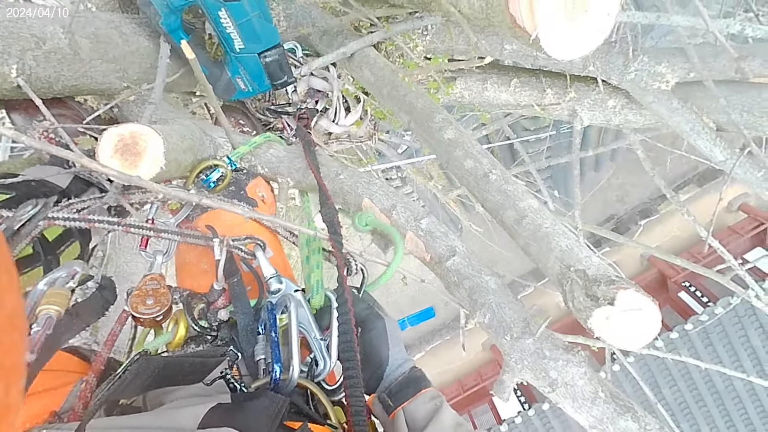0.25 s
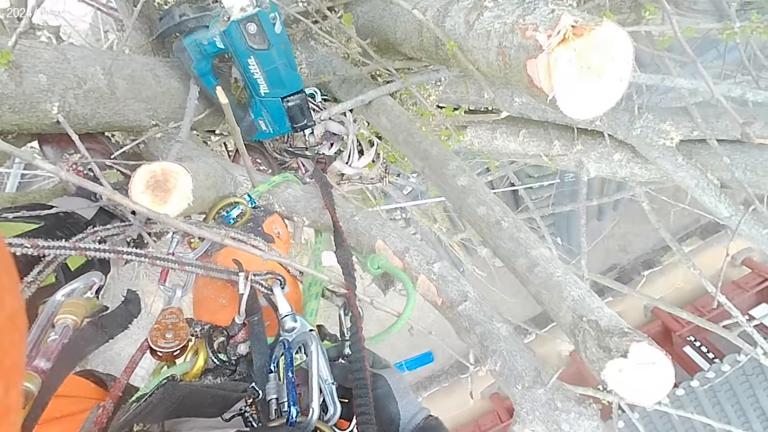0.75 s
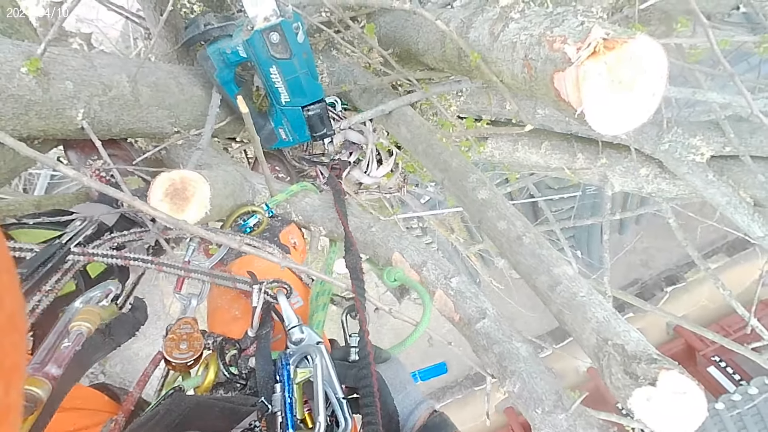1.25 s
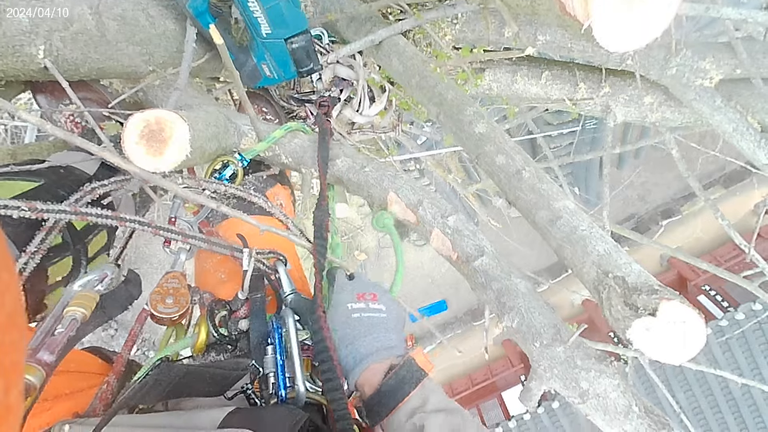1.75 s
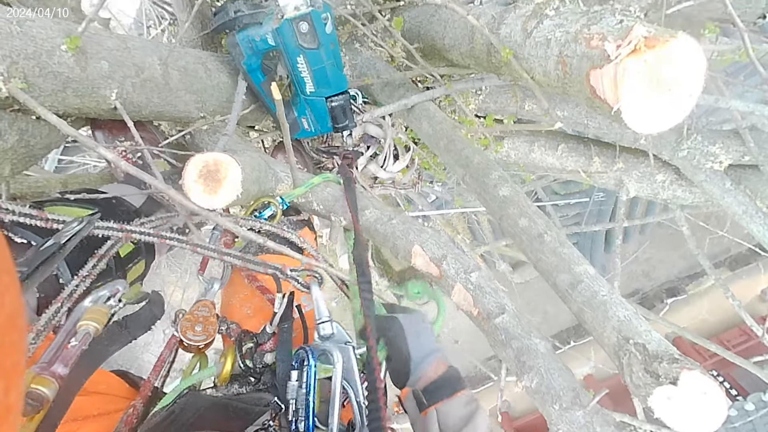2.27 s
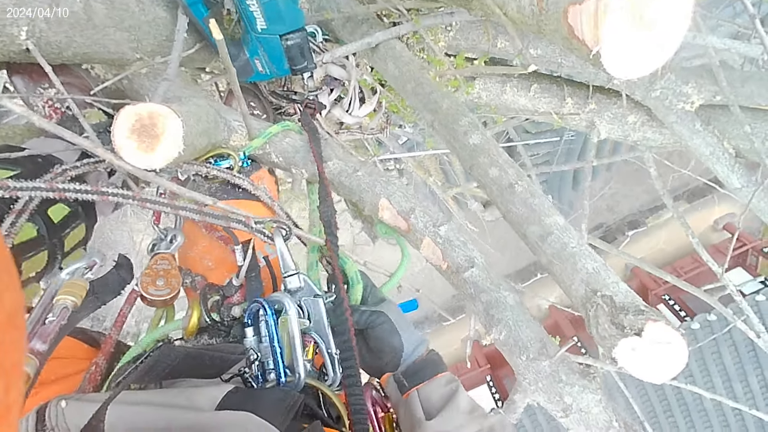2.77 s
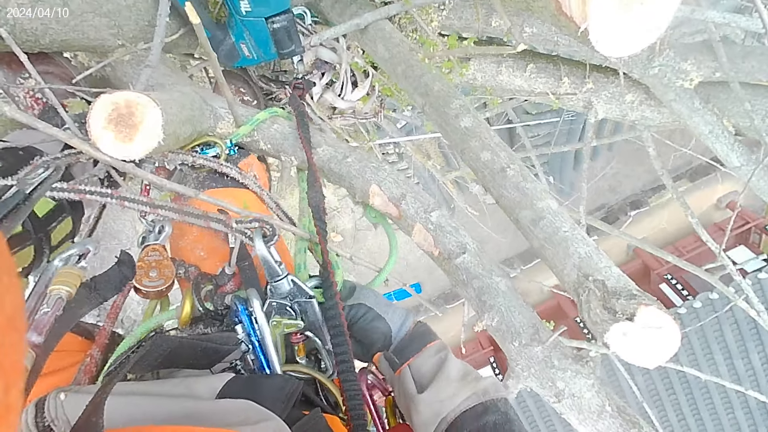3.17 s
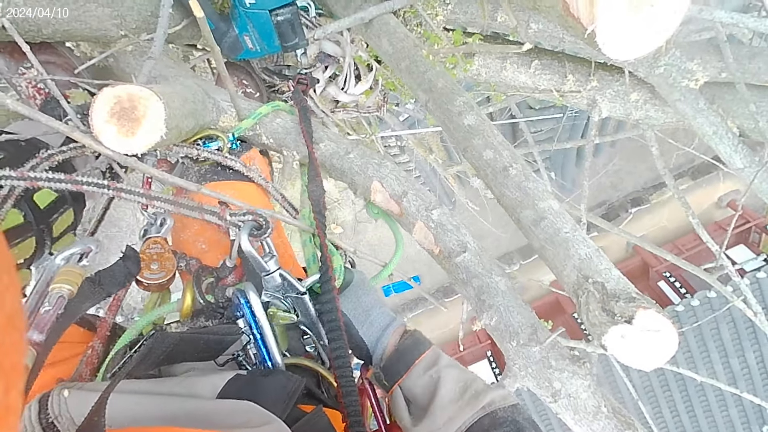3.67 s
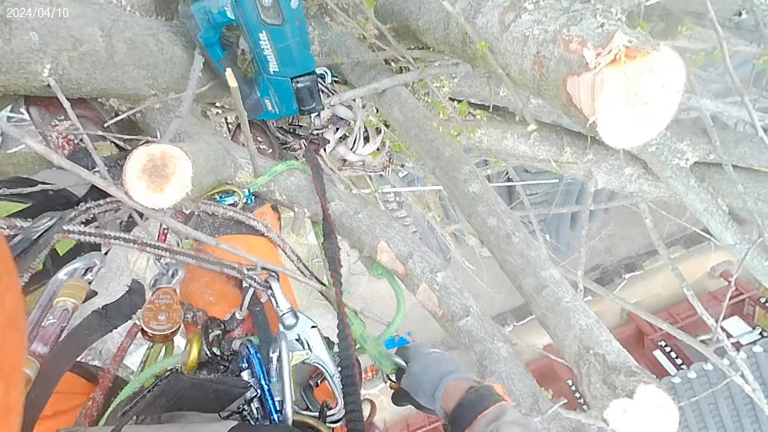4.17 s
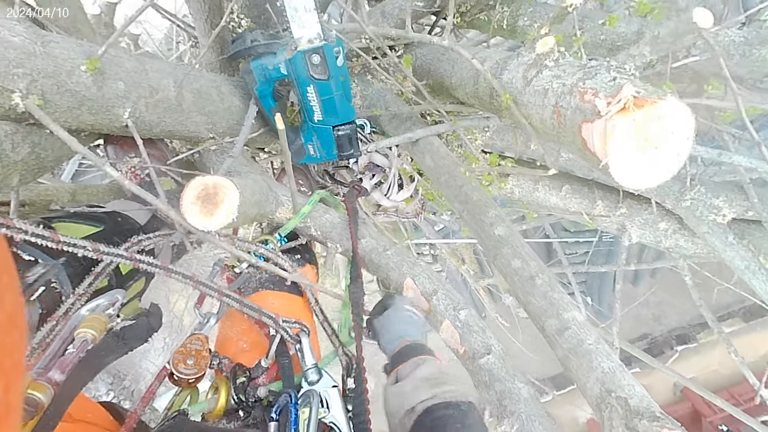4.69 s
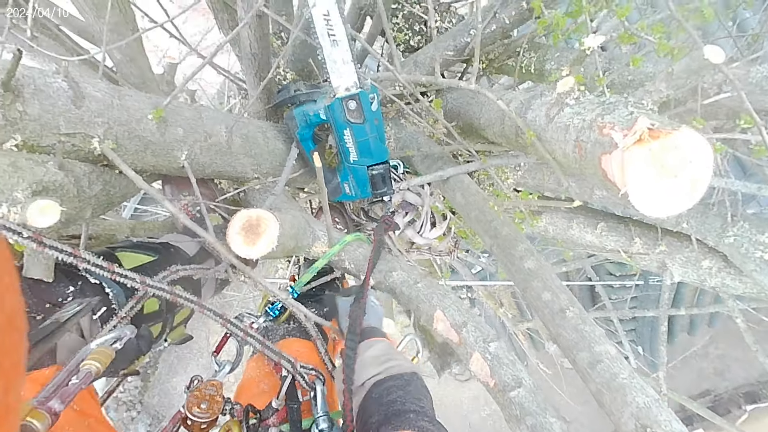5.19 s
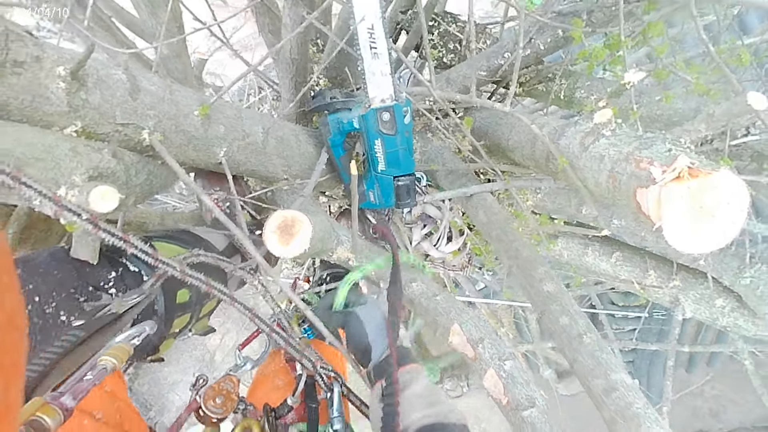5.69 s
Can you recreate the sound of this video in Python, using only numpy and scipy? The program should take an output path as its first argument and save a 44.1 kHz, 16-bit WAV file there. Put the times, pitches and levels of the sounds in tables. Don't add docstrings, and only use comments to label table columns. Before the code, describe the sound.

Loose metal climbing hardware clicks and clinks in uneven clusters on a harness while wind rumbles, flutters and bumps against a close microphone outdoors.

```python
import sys
import numpy as np
from scipy import signal
from scipy.fft import rfft, irfft
from scipy.io import wavfile
from scipy.ndimage import uniform_filter1d

SR = 44100
rng = np.random.default_rng(int(sys.argv[2]) if len(sys.argv) > 2 else 0)


def field_ratio(decibels):
    return 10 ** (np.asarray(decibels, dtype=float) / 20)


def store_wav(level_fs):
    pcm = np.round(np.clip(np.atleast_2d(level_fs), -1, 1) * 32767)
    wavfile.write(sys.argv[1], SR, pcm.T.astype(np.int16))


N = 261954
TIME = np.arange(N) / SR


def unit(x):
    return x / np.sqrt(np.mean(x ** 2) + 1e-30)


def colour(x, points):
    hz, db = np.transpose(points)
    log_hz = np.log(np.fft.rfftfreq(len(x), 1 / SR) + 1e-3)
    gain = field_ratio(np.interp(log_hz, np.log(hz), db, left=-80, right=-80))
    return irfft(rfft(x) * gain, len(x))


def hump(hz, octaves, skirt_db):
    return [(hz / 2 ** octaves, skirt_db), (hz, 0), (hz * 2 ** octaves, skirt_db)]


def smooth_twice(x, size):
    return uniform_filter1d(uniform_filter1d(x, size), size)


def walk(rate):
    hold = int(SR / rate)
    steps = np.repeat(rng.standard_normal(N // hold + 1), hold)
    return unit(smooth_twice(steps, hold)[:N])


def steady(x, window_s=0.16):
    return x / np.sqrt(smooth_twice(x ** 2, int(window_s * SR)) + 1e-30)


def curves(table):
    s, *columns = np.transpose(table)
    return [np.interp(TIME, s, c) for c in columns]


def add(out, s, x):
    i = int(s * SR)
    out[i:i + len(x)] += x[:N - i]


# freq_hz [Hz], density_db [dB per Hz]
AIR_SPECTRUM = [(100, -20), (150, -2), (340, -8.4), (950, -17.2), (1600, -25), (4500, -31), (15750, -35.6),
                (15950, -52)]


def air():
    level_db = -51.7 + 0.5 * walk(1.5)
    return unit(colour(rng.standard_normal(N), AIR_SPECTRUM)) * field_ratio(level_db)


# start_s [s], level_db [dB]
FAR_KNOCKS = [(0.433, -60), (0.525, -55), (0.62, -53), (0.719, -52.5), (.82, -53), (.92, -55.5),
              (1.024, -56.5), (1.123, -61), (1.224, -57)]


def machine():
    out, t = np.zeros(N), TIME[:4096]
    for s, db in FAR_KNOCKS:
        puff = unit(colour(rng.standard_normal(len(t)), [(700, 4), (1400, -6), (2300, -3.5), (4500, -22)]))
        add(out, s, field_ratio(db + 2.5 - 60 * t / 0.1) * (1 - np.exp(-t / 0.00093)) * puff)
    return out


# start_s [s], level_db [dB]
GUST = [(0, -33), (.2, -24), (.65, -25), (1.1, -24), (1.27, -37), (1.47, -23), (1.62, -33), (2.1, -34),
        (2.4, -39), (2.72, -34), (3.1, -37), (3.4, -32), (3.75, -32), (4.3, -27.5), (4.65, -42), (5.2, -29),
        (5.55, -33), (5.86, -30)]
# freq_hz [Hz], density_db [dB per Hz]
RUMBLE_SPECTRUM = [(8, 4), (20, 3), (35, -6), (55, -10.5), (90, -36)]
# freq_hz [Hz], density_db [dB per Hz]
FLUTTER_SPECTRUM = [(40, -28), (65, 1.5), (120, -2), (200, -18), (350, -32)]


def buffeting():
    gust_db, = curves(GUST)
    flutter_db = -42.5 + 0.48 * (gust_db + 28)
    rumble = steady(colour(rng.standard_normal(N), RUMBLE_SPECTRUM))
    flutter = unit(colour(rng.standard_normal(N), FLUTTER_SPECTRUM))
    out = field_ratio(gust_db + 1.8 + 2.2 * walk(14)) * rumble
    return out + field_ratio(flutter_db - 3.5 + 1.97 * walk(22)) * flutter


# start_s [s], peak_db [dB], cycle_hz [Hz]
SLAPS = [(0.033, -27.5, 65.7), (0.086, -26, 73.0), (0.191, -20, 79.5), (0.434, -22, 70), (0.48, -27, 70.5),
         (0.528, -25.5, 91.5), (0.773, -22, 70.4), (0.818, -22, 66.5), (1.041, -22, 80.5),
         (1.149, -29, 85.5), (1.287, -27.5, 75.5), (2.161, -26, 64), (2.983, -33, 80.0), (3.071, -27, 70),
         (3.848, -18.5, 53), (3.885, -21, 98), (4.318, -26, 59), (4.399, -28.5, 61), (4.563, -24.5, 50.7),
         (4.73, -33, 50.3), (4.842, -26, 49), (5.112, -27, 49.7), (5.145, -32, 80), (5.388, -36, 50),
         (5.858, -28.5, 57)]
# start_s [s], peak_db [dB], cycle_hz [Hz]
DIPS = [(.29, -17, 30), (.648, -14, 40), (1.008, -19, 35), (1.212, -20, 40), (2.733, -14, 30),
        (3.27, -19, 30), (4.335, -18, 40), (5.126, -22, 45), (5.335, -20, 40), (5.48, -23, 25),
        (2.01, -23, 25), (5.71, -24, 25)]
# start_s [s], peak_db [dB], swing_hz [swings per s]
SHOVES = [(1.442, -15, 22), (1.909, -20, 40), (4.1165, -10, 38), (2.092, -24, 32), (5.285, -22, 15),
          (4.975, -21, 16), (1.522, -24, 18)]


def eddies():
    out, t = np.zeros(N), TIME[:4410] - 0.05
    for s, db, hz in SLAPS:
        swing = -np.tanh(8 * t * hz) * np.exp(-(t * hz / 0.73) ** 2)
        add(out, max(s + t[0], 0), field_ratio(db + 3.5) * swing)
    for s, db, hz in DIPS:
        u = (2.2 * t * hz) ** 2
        add(out, s + t[0], field_ratio(db) * (2 * u - 1) * np.exp(-u))
    for s, db, hz in SHOVES:
        turn = np.minimum(TIME[:len(t)] * hz, 1)
        onset = np.minimum(turn / 0.12, 1)
        add(out, s, field_ratio(db - 6 * turn) * onset * np.sin(2 * np.pi * turn ** 0.75))
    return out


# start_s [s], creak_db [dB]
EFFORT = [(0, -70), (1.32, -70), (1.58, -48), (1.8, -69), (2.3, -58), (2.52, -50), (2.7, -79), (3.4, -62),
          (3.58, -68), (3.9, -57), (4.12, -52), (4.35, -66), (5.05, -58), (5.64, -60), (5.72, -49),
          (5.82, -43), (5.94, -49)]
# start_s [s], rustle_db [dB]
DRAG = [
    (5.55, -76),
    (5.64, -66),
    (5.72, -63),
    (5.77, -74),
    (5.82, -63),
    (5.94, -72),
]


def rope():
    (creak_db,), (drag_db,) = curves(EFFORT), curves(DRAG)
    rustle_db = -70.5 + 0.33 * (creak_db + 61)
    burst_db = 3.5 * np.minimum(rng.exponential(size=(2, N)), 6)
    fibres, webbing = rng.standard_normal((2, N)) * field_ratio(burst_db)
    rustle = unit(colour(fibres, [(3000, -1), (6000, 1), (9500, -5), (12500, -10.5), (15500, -5)]))
    rustle = rustle * field_ratio(rustle_db - 1.3 + 1.8 * walk(150))
    sheath = unit(colour(fibres, [(5000, -13), (9800, 0), (13000, -13), (15500, -28)]))
    sheath = (TIME > DRAG[0][0]) * field_ratio(drag_db) * sheath
    creak = unit(colour(webbing, hump(695, 1.5, -15.5))) * field_ratio(creak_db - 4.0 + 3.9 * walk(40))
    return rustle + sheath + creak


# start_s [s], pitch_hz [Hz], level_db [dB]
RINGS = [(1.3944, 11070, -47), (1.4368, 6830, -50), (1.4368, 11000, -50.5), (1.592, 4800, -47),
         (1.6915, 11100, -50), (2.4214, 9520, -57), (2.8219, 8200, -62), (2.8497, 10070, -44),
         (2.8735, 12400, -54), (4.1009, 4690, -51), (4.1646, 11530, -61), (4.9611, 6480, -56),
         (5.0598, 7760, -60), (5.0678, 7500, -56), (5.0758, 7820, -51.5), (5.7233, 6480, -39.5),
         (5.7233, 8160, -39), (5.7233, 10050, -44), (5.8099, 11000, -54), (5.8354, 10000, -54),
         (5.8354, 10910, -60), (5.9327, 12500, -55)]
# pitch_hz [Hz], level_db [dB], fall_s [s to fall 80 dB]
GATE_MODES = [
    (2310, -43, 0.028),
    (7600, -57, 0.24),
    (7770, -23.5, 0.052),
    (10910, -37, 0.093),
]
# start_s [s], pitch_hz [Hz], level_db [dB], fall_s [s to fall 80 dB]
BODIES = [(3.7406, 600, -40, .03), (5.809, 300, -38, .06), (5.69, 280, -44, .06), (5.0037, 1600, -40, .02),
          (.3432, 720, -50, .04), (.354, 700, -52, .03), (.444, 900, -46, .03), (.4738, 850, -48, .03),
          (.558, 1000, -51, .03), (3.918, 800, -44, .04), (5.684, 760, -43, .03), (1.4368, 645, -52, .04),
          (3.7641, 740, -38, .025), (3.7765, 690, -33, .04), (4.1009, 444, -31.5, 0.045),
          (5.7886, 300, -40, 0.17), (5.7892, 960, -20.5, 0.018), (5.7886, 1563, -35, 0.056),
          (5.8354, 1830, -39, 0.044), (5.8964, 980, -30.5, .027)]
# start_s [s], pitch_hz [Hz], level_db [dB]
CHIMES = [(1.3944, 6500, -46), (1.406, 6600, -54), (1.5767, 11000, -46), (1.592, 9300, -44),
          (1.6066, 11000, -45), (1.6066, 4700, -44), (1.6915, 3900, -42), (1.6925, 6300, -46),
          (2.2225, 7400, -50), (2.2686, 9600, -38), (2.27, 5000, -42), (2.8735, 10200, -48),
          (2.9101, 3200, -44), (2.912, 10200, -42), (2.962, 9800, -58), (3.464, 9400, -57),
          (3.47, 5600, -56), (3.4858, 1950, -48), (3.488, 9400, -50), (3.7406, 8800, -46),
          (3.92, 10700, -52), (3.9612, 5300, -52), (4.06, 3650, -52), (4.066, 6300, -54),
          (4.0812, 10900, -52), (4.0919, 12600, -46), (4.0919, 3200, -50), (4.1166, 4650, -38),
          (4.119, 9500, -42), (4.1482, 10800, -50), (4.2449, 8400, -52), (4.2449, 12400, -56),
          (4.396, 11800, -57), (4.4152, 6800, -52), (4.9611, 11700, -56), (5.403, 5300, -44),
          (5.884, 11800, -54)]
# start_s [s], level_db [dB]
LINK_NUDGES = [(1.525, -67), (1.9556, -67), (2.0411, -63), (2.103, -68), (2.2394, -69), (2.381, -68),
               (2.5327, -63), (4.2443, -59)]


def rings():
    out, t = np.zeros(N), TIME[:8820]
    struck = [(s, hz, db, 0.067) for s, hz, db in RINGS]
    struck += [(5.0037, *mode) for mode in GATE_MODES]
    struck += list(BODIES)
    struck += [(s, hz, db - 2, 0.034) for s, hz, db in CHIMES]
    struck += [(s, 5600, db, 0.18) for s, db in LINK_NUDGES]
    for s, hz, db, t60 in struck:
        twin_phase = 2 * np.pi * rng.random()
        touch_db = 3 * unit(uniform_filter1d(rng.standard_normal(len(t)), size=90))
        pair = np.sin(2 * np.pi * hz * t) + 0.3 * np.sin(2 * np.pi * hz * 1.008 * t + twin_phase)
        add(out, s, field_ratio(db + 5.5 - 80 * t / t60 + touch_db) * (1 - np.exp(-t / 0.00077)) * pair)
    return out


# start_s [s], pitch_hz [Hz], level_db [dB]
SNAPS = [(1.4366, 7700, -33), (1.5765, 4480, -35), (1.5918, 9500, -32), (1.6064, 2760, -40),
         (1.6066, 6090, -35), (1.6816, 3450, -37), (1.6816, 2300, -44), (2.2215, 7580, -40),
         (2.2686, 3560, -38), (2.2687, 7240, -19), (2.4902, 6200, -32), (2.5327, 4700, -36),
         (2.5586, 6090, -38), (2.5588, 3100, -40), (2.9103, 6320, -24), (3.7406, 3220, -38),
         (3.7641, 6890, -30), (3.778, 7000, -24), (4.109, 4700, -38), (5.0043, 6320, -21),
         (5.0043, 11140, -26), (5.7185, 10100, -34), (5.7897, 3450, -19), (5.7897, 8300, -22),
         (5.806, 10000, -36), (5.82, 8000, -34), (5.8356, 3220, -36), (5.8579, 6900, -38),
         (3.5136, 5500, -40), (3.618, 5800, -46)]
# start_s [s], pitch_hz [Hz], level_db [dB]
THUDS = [(1.3946, 620, -42), (1.4425, 720, -34), (1.561, 650, -39), (1.58, 560, -39), (1.636, 920, -46),
         (1.8325, 1260, -42), (2.2265, 800, -37), (2.2967, 1490, -43), (2.332, 900, -40),
         (2.5327, 1150, -43), (2.579, 800, -39), (2.8803, 700, -41), (3.4858, 1950, -42),
         (3.4858, 700, -37), (3.7645, 880, -28), (3.7768, 740, -20), (3.778, 2180, -40), (3.789, 800, -36),
         (4.1009, 1950, -38), (4.1015, 600, -26), (5.0037, 1600, -36), (5.7925, 1490, -25),
         (5.806, 480, -36), (5.809, 2070, -38), (5.8165, 1840, -37), (5.8356, 920, -33), (4.502, 800, -40)]


def snaps_and_thuds():
    out, t = np.zeros(N), TIME[:1500]
    for table, t60 in ((SNAPS, 0.007), (THUDS, 0.022)):
        for s, hz, db in table:
            add(out, s, field_ratio(db - 60 * t / t60) * np.sin(2 * np.pi * hz * t))
    return out


# start_s [s], level_db [dB]
PUSHES = [
    (.4448, -32),
    (.4752, -35),
    (5.7894, -12),
]


def pushes():
    out, width_s = np.zeros(N), 0.00012
    for s, db in PUSHES:
        u = (TIME - s) / width_s
        out += field_ratio(db) * (np.exp(-u ** 2) - np.exp(-(u / 4 - 1) ** 2) / 4)
    return out


# start_s [s], crack_db [dB], brightest_hz [Hz], rattle_t60_s [s]
FREE_CLINKS = [(1.3944, -30.5, 9520, 0.02), (1.5767, -35, 4500, .038), (1.592, -29.5, 6740, .051),
               (1.6066, -28, 6750, 0.039), (1.9556, -42, 6380, .036), (2.2586, -47, 7640, .034),
               (2.2686, -25, 7370, 0.03), (2.4399, -44, 7600, .03), (2.4902, -31.5, 6240, .064),
               (2.8219, -41.5, 6980, 0.063), (2.8497, -32, 10000, 0.04), (2.8735, -40, 5990, 0.054),
               (2.8855, -41, 6910, .022), (2.9101, -28, 6750, 0.025), (4.0919, -34, 7860, 0.027),
               (4.6909, -40, 9800, .014), (4.7096, -37.5, 6840, 0.043), (4.9952, -31.5, 7600, .073),
               (5.0037, -19.5, 7900, 0.03), (5.0073, -23, 7640, .027), (5.7183, -37, 6440, 0.028),
               (5.7233, -34, 8270, 0.064), (5.7925, -15, 8130, 0.016)]
# start_s [s], crack_db [dB], brightest_hz [Hz], rattle_t60_s [s]
HARNESS_CLINKS = [(1.6915, -30, 8300, 0.03), (2.2902, -46, 9910, .028), (2.2967, -34, 4400, .05),
                  (2.8803, -37.5, 8300, 0.02), (3.7406, -35, 3470, .025), (4.1166, -28, 7060, .031),
                  (4.3939, -41.5, 6740, .041), (4.4152, -41.5, 9700, 0.044), (4.9611, -46, 10200, .044),
                  (5.6973, -34.5, 9600, 0.011), (5.8681, -43, 6100, 0.057), (5.8964, -32.5, 4640, 0.055),
                  (5.9327, -39, 8000, .039)]
# start_s [s], crack_db [dB], brightest_hz [Hz], rattle_t60_s [s]
FREE_CLACKS = [(2.0411, -44, 6560, .036), (2.2394, -42, 5200, .027), (2.3137, -42.5, 6700, .032),
               (2.5586, -39, 5880, 0.031), (3.5136, -47, 3170, .029), (3.7867, -31.5, 6700, .019),
               (4.1821, -43, 7400, 0.034), (4.2449, -40.5, 5600, 0.04), (5.8579, -46, 6760, 0.045),
               (5.8837, -44, 8910, 0.21)]
# start_s [s], crack_db [dB], brightest_hz [Hz], rattle_t60_s [s]
BUCKLE_CLACKS = [(1.6814, -44, 3500, 0.027), (1.6229, -44, 6760, .034), (2.4214, -43.5, 4700, 0.081),
                 (2.4872, -47, 6170, .03), (2.5327, -38, 4830, .025), (3.2073, -42, 3360, .017),
                 (3.9865, -40, 5200, 0.038), (4.0812, -40.5, 4500, .021), (4.1009, -27, 4670, 0.018),
                 (5.4018, -34.5, 9740, 0.037), (5.8354, -30.5, 6100, 0.044)]
# start_s [s], crack_db [dB], brightest_hz [Hz], rattle_t60_s [s]
BUMPS = [
    (.3432, -51.5, 4600, .03),
    (.4738, -49, 4830, 0.03),
    (2.0646, -45.5, 5170, 0.015),
    (5.7894, -28, 6120, 0.05),
    (5.81, -40, 5300, 0.061),
]
# start_s [s], crack_db [dB], brightest_hz [Hz], rattle_t60_s [s]
BELT_CLINKS = [(1.4368, -39, 4960, 0.048), (1.8309, -39, 10200, 0.047), (2.2269, -43, 5000, 0.03),
               (3.4858, -36, 6840, 0.027), (3.7641, -29, 7020, .013), (3.7765, -25, 9000, 0.044),
               (3.918, -37, 6400, 0.029), (3.9612, -40, 10600, .026), (4.1482, -41.5, 3840, .038),
               (5.82, -45, 7040, .06), (5.8304, -51, 4650, .043)]
# start_s [s], crack_db [dB], brightest_hz [Hz], rattle_t60_s [s]
REBOUNDS = [(1.406, -50, 9500, .03), (1.604, -42, 5000, .02), (1.611, -42, 7000, .02),
            (2.2225, -47, 7400, .012), (2.273, -43, 7300, .03), (2.335, -50, 9000, .015),
            (2.342, -49, 8000, .015), (2.472, -50, 5500, .015), (2.87, -48, 6500, .015),
            (2.921, -44, 8000, .02), (3.83, -57, 5200, .05), (4.104, -36, 9000, .025),
            (4.656, -56, 6800, .03), (5.407, -49, 8000, .03), (5.737, -48, 10000, .04),
            (5.668, -52, 9800, .03), (5.685, -50, 9500, .02), (5.705, -50, 10200, .03),
            (5.799, -47, 2200, .03), (5.826, -48, 6500, .02), (5.843, -46, 4000, .03),
            (5.875, -50, 9400, .03), (5.892, -49, 7000, .015), (5.904, -44, 6500, .03),
            (5.912, -50, 8600, .03), (2.497, -44, 9500, .03), (2.432, -50, 12000, .015),
            (3.781, -36, 10500, .02), (3.791, -38, 4200, .02), (5.012, -50, 5300, .025)]
# start_s [s], crack_db [dB]
THIN_TICKS = [(1.032, -55), (1.2957, -54), (1.572, -49), (1.7243, -60), (1.77, -49.5), (1.7855, -55),
              (2.0, -50), (2.4346, -48), (2.5258, -51), (2.6422, -57), (2.6917, -52), (2.8007, -52),
              (2.898, -51), (2.9526, -52), (4.058, -50), (4.065, -52), (5.0598, -64), (5.0678, -61),
              (5.215, -55)]
# start_s [s], crack_db [dB]
PLAIN_TICKS = [(.078, -55), (.5703, -50.5), (.5806, -54), (1.5631, -50), (1.6433, -55), (1.7306, -52),
               (2.103, -55), (2.204, -51), (2.214, -52), (2.33, -46), (2.339, -51), (2.3495, -52),
               (2.381, -54.5), (2.4052, -60), (2.595, -63), (2.934, -56), (3.0407, -49), (3.217, -50.5),
               (3.2295, -59), (3.4645, -54), (3.5006, -45), (3.5068, -50), (4.1644, -47.5), (4.2396, -62),
               (4.487, -50.5), (5.6349, -55)]
# start_s [s], crack_db [dB]
DULL_TICKS = [(.0128, -56), (.4424, -53), (.5552, -56), (1.1141, -57.5), (1.455, -56.5), (1.5469, -58),
              (1.8976, -59), (2.0747, -52), (2.0903, -61), (2.4683, -52.5), (2.522, -54), (2.578, -51),
              (2.6348, -53), (3.0549, -64), (4.5012, -56.5), (4.9155, -54), (5.105, -57.5), (5.4962, -57.5),
              (5.6842, -70), (5.777, -64)]


def touches():
    # (table, clack dB above crack, knock dB above crack)
    firm = [(FREE_CLINKS, -19, -21), (HARNESS_CLINKS, -13.5, -7.5), (FREE_CLACKS, -9, -16.5),
            (BUCKLE_CLACKS, -6, -4.5), (BUMPS, 3.5, 0), (BELT_CLINKS, -21, -5.5), (REBOUNDS, -19, -21)]
    light = [(THIN_TICKS, -7, -12), (PLAIN_TICKS, -3.5, 1), (DULL_TICKS, 0.3, 11.5)]
    rows = []
    for table, clack_db, knock_db in firm:
        rows += [(s, db, hz, clack_db, knock_db, t60) for s, db, hz, t60 in table]
    for table, clack_db, knock_db in light:
        rows += [(s, db, 5300, clack_db, knock_db, 0.055) for s, db in table]
    return rows


def change_db(table, s):
    return sum(db for when, db in table if abs(when - s) < 0.003)


# freq_hz [Hz], density_db [dB per Hz]
CRACK_SPECTRUM = [(2500, -11), (4000, -5.5), (7000, -0.5), (10800, -4), (12500, -11.5), (16000, -20)]
GEAR_HZ = np.array([4700, 5600, 6500, 8300, 9700, 11000])
# start_s [s], change_db [dB]
WEAKER_RING = [(1.4368, -5), (1.5767, -4), (1.6066, -6), (1.6915, -5), (2.5327, -5), (2.8803, -10), (3.4858, -10),
               (3.5136, -8), (3.7406, -8), (3.7867, -5), (3.918, -12), (4.0919, -6), (4.1009, -6), (4.9611, -6),
               (5.8681, -8), (5.8837, -10)]
# start_s [s], knock_change_db [dB]
WEAKER_KNOCK = [(.4424, -8), (1.4368, -8), (1.5469, -12), (2.0646, -8), (2.4683, -4), (2.522, -12),
                (2.5327, -8), (3.2073, -6), (3.5006, -8), (4.1166, -4), (4.9155, -8), (3.7641, -10),
                (3.7765, -8), (5.8964, -6), (5.7886, -12), (5.8354, -8)]


def contacts():
    out, t = np.zeros(N), TIME[:4096]
    for s, db, hz, clack_db, knock_db, t60 in touches():
        noise = rng.standard_normal((4, len(t)))
        chatter = field_ratio(2.6 * unit(uniform_filter1d(noise[3], size=30)))
        tail = field_ratio(-60 * t / max(t60, 0.008)) * chatter
        first_touch = 1.25 * field_ratio(-60 * t / 0.003)
        shape = (tail + first_touch) * (1 - np.exp(-t / 0.00017))
        top_hz, top_db = CRACK_SPECTRUM[-1]
        edge = CRACK_SPECTRUM[:-1] + [(top_hz, top_db + 0.72 * (db + 25))]
        crack = shape * unit(colour(noise[0], edge))
        body = field_ratio(-60 * t / 0.017) * unit(colour(noise[1], hump(hz, 0.18, -36)))
        wake = field_ratio(2.5 * noise[1, :len(GEAR_HZ), None] - 20)
        mode_hz = GEAR_HZ[:, None] * (1 + 0.014 * noise[2, 0])
        body += field_ratio(-60 * t / 0.023) * np.sum(wake * np.sin(2 * np.pi * mode_hz * t), axis=0)
        body *= field_ratio(change_db(WEAKER_RING, s))
        clack = shape * unit(colour(noise[2], hump(2400, 0.97, -4.0)))
        knock_hz = 660 * (1 + 0.087 * noise[3, 0])
        padding = 1.09 * unit(colour(noise[3], hump(680, 1.7, -21.5)))
        knock = field_ratio(-60 * t / 0.035) * (np.sin(2 * np.pi * knock_hz * t) + padding)
        knock *= field_ratio(change_db(WEAKER_KNOCK, s))
        mix = crack + 1.38 * body + field_ratio(clack_db + 3.5) * clack + field_ratio(knock_db + 6) * knock
        add(out, s, field_ratio(db - 7) * mix)
    return out


def tree_scatter(gear):
    t = TIME[:4096]
    scatter = colour(rng.standard_normal(len(t)), hump(1900, 4.5, -26)) * field_ratio(-60 * t / 0.028)
    return signal.fftconvolve(gear, scatter / np.sqrt(np.sum(scatter ** 2)))[:N]


def scene():
    around = air() + machine() + buffeting() + eddies() + rope()
    gear = rings() + snaps_and_thuds() + pushes() + contacts()
    return (around + gear + field_ratio(-24) * tree_scatter(gear))[None]


def top_cut(x):
    return signal.sosfilt(signal.butter(12, 16660, fs=SR, output="sos"), x)


def record(dry):
    low_pass = signal.ellip(8, 0.2, 60, 16000, fs=SR, output="sos")
    mix = signal.sosfilt(low_pass, dry)
    return top_cut(mix)


dry = scene()
out = record(dry)
store_wav(out)
```